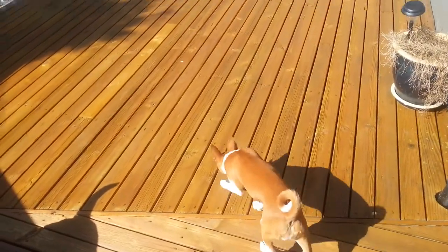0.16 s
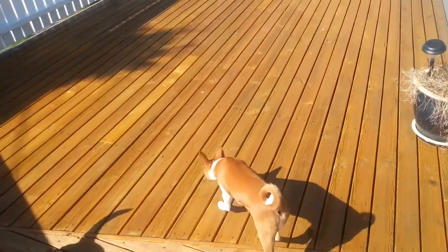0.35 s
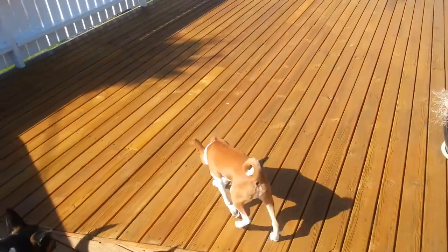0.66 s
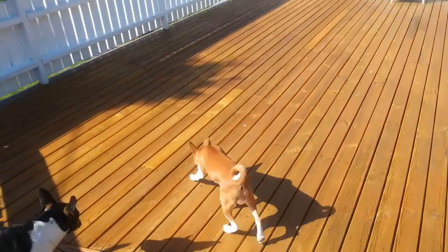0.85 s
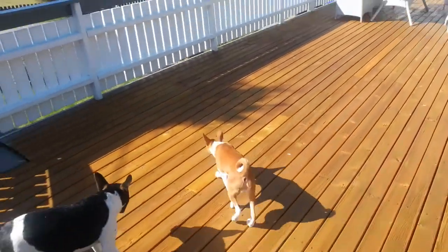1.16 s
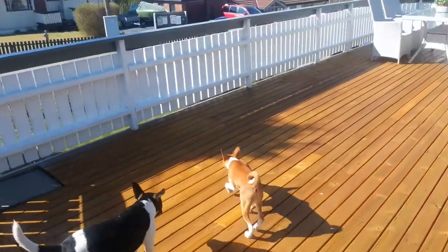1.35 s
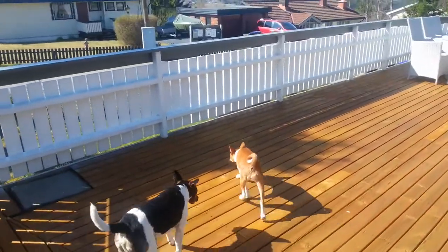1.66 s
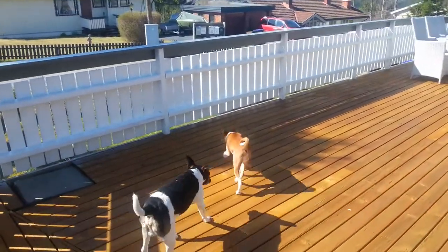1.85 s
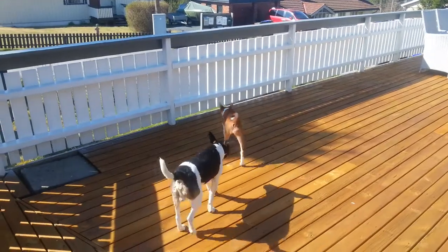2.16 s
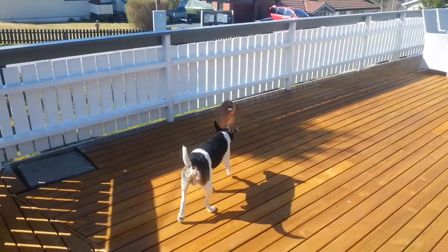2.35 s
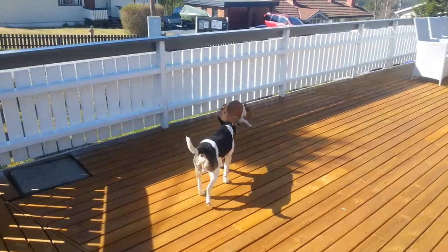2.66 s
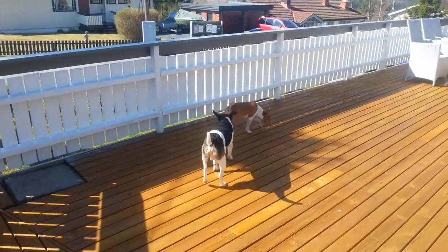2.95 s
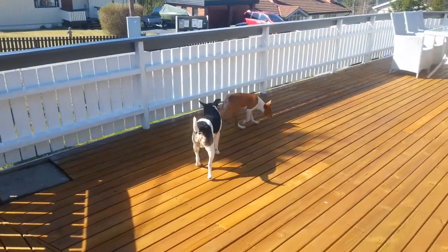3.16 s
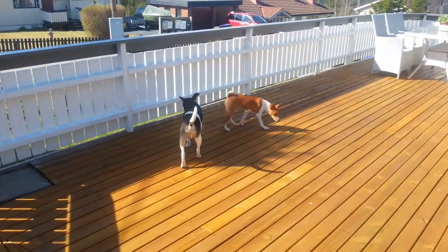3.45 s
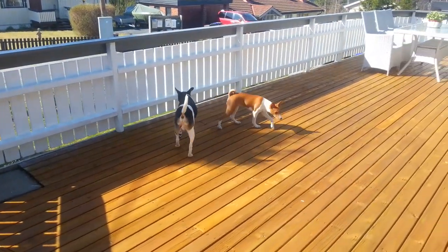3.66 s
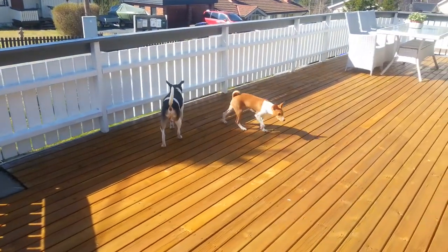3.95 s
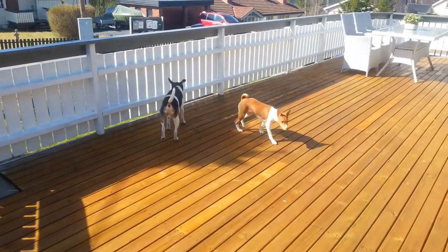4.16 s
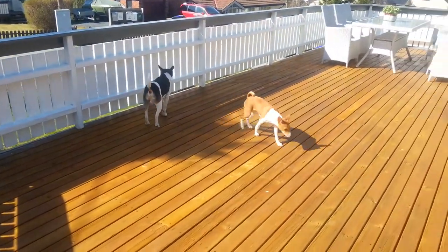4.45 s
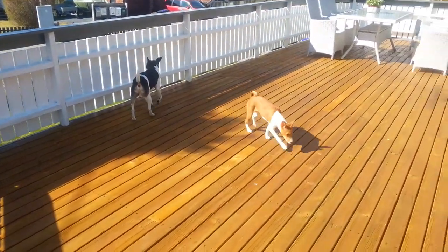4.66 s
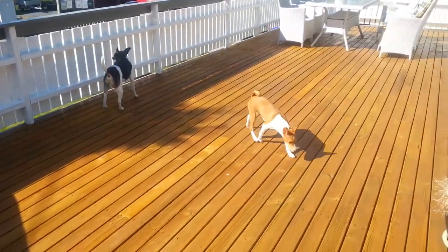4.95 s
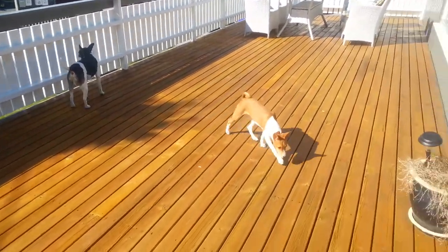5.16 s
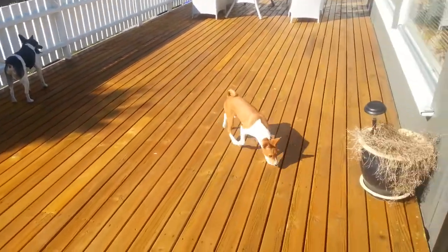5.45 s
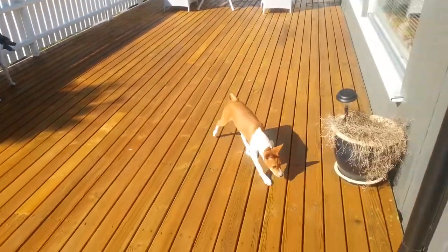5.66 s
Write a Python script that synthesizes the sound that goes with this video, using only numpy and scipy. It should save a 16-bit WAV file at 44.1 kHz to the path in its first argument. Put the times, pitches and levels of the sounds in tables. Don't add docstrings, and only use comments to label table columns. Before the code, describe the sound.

Dog claws click sharply and irregularly over a hollow wooden deck, then sparse steps, a faint songbird, and wind buffeting the microphone at the end.

```python
import sys
import numpy as np
from scipy import signal
from scipy.fft import rfft, irfft, next_fast_len
from scipy.io import wavfile
from scipy.ndimage import uniform_filter1d

SR = 44100
rng = np.random.default_rng(int(sys.argv[2]) if len(sys.argv) > 2 else 0)


def ratio_of_db(decibels):
    return 10 ** (np.asarray(decibels, float) / 20)


def pcm_store(signal):
    levels = np.round(np.clip(np.atleast_2d(signal), -1, 1) * 32767)
    wavfile.write(sys.argv[1], SR, levels.astype(np.int16).T)


N = 255339
SIDES = np.array([[.5], [-.5]])


def unit(x):
    return x / np.sqrt(np.mean(x ** 2, axis=-1, keepdims=True))


def tilt(x, points, share=1):
    size = next_fast_len(x.shape[-1], True)
    hz = np.fft.rfftfreq(size, 1 / SR) + 1
    p = np.array(points, float)
    gain_db = np.interp(np.log(hz), np.log(p[:, 0]), p[:, 1])
    return irfft(rfft(x, size) * ratio_of_db(gain_db * share), size)[..., :x.shape[-1]]


def coloured(x, points, lo_hz=1, hi_hz=SR / 2.1):
    band = signal.butter(3, [lo_hz, hi_hz], "band", fs=SR, output="sos")
    return unit(signal.sosfilt(band, tilt(x, points)))


def walk(rate, channels=2):
    k = int(SR / rate)
    held = np.repeat(rng.standard_normal((channels, N // k + 1)), k, axis=1)
    return unit(uniform_filter1d(uniform_filter1d(held, k), k)[:, :N])


def columns(table):
    s, *rest = np.transpose(table)
    return [np.interp(np.arange(N) / SR, s, c) for c in rest]


def add(out, s, sound):
    i = int(s * SR)
    out[..., i:i + sound.shape[-1]] += sound[..., :N - i]


def suppressor(near, over_db, depth_db):
    frame = np.hanning(int(0.036 * SR))
    power = signal.fftconvolve(np.mean(near ** 2, axis=0), frame / frame.sum(), "same")
    power = np.maximum(power, 0)
    return ratio_of_db(depth_db * power / (power + ratio_of_db(over_db) ** 2))


# [f/Hz, level/dB per Hz]
SUBURB_COLOUR = [(18, -36), (30, 2), (176, -9), (437, -8.5), (662, -17), (905, -11), (1970, -23.5),
                 (2490, -17.5), (2990, -19), (6880, -18.5), (13500, -21.5), (15000, -30.5)]
# [f/Hz, likeness 0-1]
LIKENESS = [(60, 0), (130, 1), (290, 0.95), (640, 0.73), (1410, 0.3), (3100, 0.2), (6820, 0.2),
            (15000, 0.19)]
# [t/s, level/dB]
BACKGROUND_SWELL = [
    (0, 1),
    (.8, 0),
    (1.5, 1),
    (2.4, -0.5),
    (3.7, 3.5),
    (4.3, 3.5),
    (5.1, 0),
    (5.5, 0),
    (5.79, 7),
]
# [f/Hz, level/dB rms, drift/dB per s]
HUM = [
    (135, -87, -0.5),
    (264, -81.5, -.5),
    (442, -79.5, -2.5),
]


def suburb(steps, gusts):
    swell_db, = columns(BACKGROUND_SWELL)
    middle_db, treble_db = -73 + swell_db, -83.5 + 0.47 * swell_db
    mid, side = rng.standard_normal((2, N))
    likeness = np.clip(LIKENESS, [1, 0], [SR, .9])
    side = coloured(side, [(hz, 10 * np.log10((1 - c) / (1 + c))) for hz, c in likeness])
    pair = mid + 0.97 * side * np.sign(SIDES)
    bass = coloured(pair, SUBURB_COLOUR, lo_hz=105, hi_hz=529) * ratio_of_db(-71.5 + 0.5 * walk(2.3))
    middle = coloured(pair, SUBURB_COLOUR, lo_hz=532, hi_hz=2190) * ratio_of_db(middle_db + 0.19 * walk(4.2))
    hiss_db, flicker_db = 8.5, 1.2
    treble = coloured(pair, SUBURB_COLOUR, lo_hz=2000) * ratio_of_db(treble_db + hiss_db + flicker_db * walk(7.9))
    t, hum, wander_db = np.arange(N) / SR, 0, 3
    for hz, db, drift_db in HUM:
        level = ratio_of_db(db + drift_db * t + wander_db * walk(8, channels=1))
        hum = hum + level * np.sin(2 * np.pi * hz * t + walk(6.4, channels=1))
    by_steps = suppressor(steps, over_db=-67.5, depth_db=4.5)
    by_wind = suppressor(gusts, over_db=-58.5, depth_db=8)
    low = (bass + hum) * by_steps ** 0.74
    return low + middle * by_steps ** 0.96 * by_wind + treble * by_steps * by_wind ** 0.52


# [f/Hz, level/dB per Hz]
WIND_COLOUR = [(25, -8), (60, 4), (128, -1), (392, -20), (650, -34), (1000, -58), (2000, -85)]
# [t/s, level/dB]
BREEZE = [(0, -69), (.25, -79), (.4, -63), (.55, -61), (.75, -71), (.85, -82), (.93, -66), (1.1, -86),
          (1.7, -85), (2, -72.5), (2.35, -72), (2.6, -76), (3.2, -72), (3.5, -84), (3.7, -75.5), (4.4, -83),
          (5.1, -85), (5.79, -80)]


def breeze():
    db, = columns(BREEZE)
    rumble = coloured(rng.standard_normal((2, N)), WIND_COLOUR, hi_hz=100)
    return rumble * ratio_of_db(db + 2.5 + 2.5 * walk(25))


# [t/s, level/dB, half length/ms]
LEFT_EDDIES = [(.629, -45, 14), (.67, -48.5, 16), (.919, -41, 4.4), (2.648, -48, 14), (2.855, -49.5, 12),
               (2.927, -32, 11), (2.986, -31, 10), (3.011, -47, 13), (3.072, -35, 12), (3.17, -54, 55),
               (3.333, -46.5, 5.6), (3.679, -55.5, 26), (4.53, -49.5, 32), (4.591, -59, 18),
               (4.623, -36, 8), (4.665, -46, 19), (4.728, -39.5, 41), (4.772, -48.5, 11), (4.845, -41, 7.4),
               (4.9, -45.5, 27), (4.977, -54, 13), (5.291, -44.5, 3.9), (5.333, -39.5, 8.5),
               (5.424, -30, 21), (5.561, -37, 37), (5.615, -39, 22), (5.71, -49, 33), (5.78, -38.5, 27)]
# [t/s, level/dB, half length/ms, swing f/Hz]
RIGHT_EDDIES = [(0.049, -56.5, 134, 104), (.39, -42, 33, 105), (.533, -43, 28, 100),
                (0.625, -38.5, 8.6, 136), (.709, -58.5, 24, 141.4), (.924, -54.5, 18, 199.6),
                (2.005, -55, 40, 105), (2.324, -53, 22, 101), (2.797, -28.5, 7.6, 91),
                (2.856, -35.5, 24, 107), (2.881, -52, 12, 91.5), (2.961, -19, 9.8, 186),
                (3.003, -23, 12.4, 150), (3.039, -25.5, 10, 150.4), (3.079, -39, 19, 100),
                (3.154, -40, 19.6, 78), (4.547, -35, 14, 81.5), (4.607, -22, 9.7, 74.3),
                (4.575, -41, 7.2, 140), (4.701, -28, 8.2, 142), (4.722, -28.5, 9, 109),
                (4.745, -30, 8, 119), (4.786, -36, 16, 107.2), (4.84, -24, 5.7, 89),
                (4.841, -31.5, 6.8, 257), (4.866, -29.5, 10, 110), (4.881, -22, 7.6, 173),
                (4.908, -30, 14, 115), (4.97, -46.5, 12, 85), (5.319, -38.5, 12, 90), (5.42, -35, 21, 99),
                (5.478, -32, 6.8, 130), (5.502, -25, 8, 138), (5.534, -30, 6.2, 142),
                (5.551, -30.5, 5.2, 130), (5.573, -26, 11, 172), (5.602, -25, 4.9, 121),
                (5.617, -30, 5.6, 130), (5.635, -16, 5.2, 127), (5.657, -23, 7, 192),
                (5.666, -28, 6.9, 100), (5.703, -11.5, 9, 172), (5.716, -21, 9.1, 340),
                (5.721, -19.5, 8, 118), (5.739, -13, 11.7, 151), (5.739, -17.5, 9.3, 372.6),
                (5.765, -19.5, 12, 233), (5.784, -13.5, 7.1, 139)]


def wind():
    swings, power, t = np.zeros((2, N)), np.zeros((2, N)), np.arange(N) / SR
    waver = np.cumsum(1 + 0.2 * walk(110), axis=1) / SR
    for port, eddies in enumerate((LEFT_EDDIES, RIGHT_EDDIES)):
        for s, db, half_ms, *swing in eddies:
            hz = swing[0] if swing else 130
            near = slice(max(int((s - .2) * SR), 0), int((s + .2) * SR))
            age = (t[near] - s) / max(half_ms / 1000, .004)
            turns = hz * (waver[port, near] - waver[port, int(s * SR)])
            swings[port, near] += ratio_of_db(db - 3.0 - 6.5 * age ** 2) * np.cos(2 * np.pi * turns)
            power[port, near] += ratio_of_db(db - 6.84 * np.abs(age)) ** 2
    body = coloured(rng.standard_normal((2, N)), WIND_COLOUR, hi_hz=241)
    edge = coloured(ratio_of_db(2.6 * walk(90)) * rng.standard_normal((2, N)), WIND_COLOUR, lo_hz=230)
    return swings + ratio_of_db(-8.0) * np.sqrt(power) * body + ratio_of_db(-11.5) * power ** 0.56 * edge


# [t/s, level/dB, length/s, final f/Hz, slide/Hz]
HIGH_NOTES = [
    (3.17, -78, 0.11, 4870, 122),
    (3.77, -63.5, 0.18, 4800, 373),
    (4.455, -62, 0.2, 4813, 416),
    (5.16, -71, 0.2, 4830, 425),
]
# [t/s, level/dB, length/s, final f/Hz, slide/Hz]
LOW_NOTES = [
    (3.435, -77, 0.22, 3370, 150),
    (4.17, -66.5, .17, 3405, 70),
    (4.31, -84, 0.25, 2750, 40),
    (4.85, -63.5, 0.17, 3445, 60),
]


def bird():
    song, (waver, flutter) = np.zeros(N), walk(70)
    husk = walk(220, channels=1)[0]
    for notes, upper_db, swell, soft in ((HIGH_NOTES, -9, 1.1, .6), (LOW_NOTES, -40, .55, 1.1)):
        for s, db, length, last_hz, drop_hz in notes:
            t = np.arange(0, length, 1 / SR)
            i = slice(int(s * SR), int(s * SR) + len(t))
            shape = np.sin(np.pi * (t / length) ** swell) ** soft * ratio_of_db(flutter[i])
            hz = last_hz + drop_hz * np.exp(-t / .05) + 21.8 * waver[i]
            whistle = shape * (1 + ratio_of_db(-7) * husk[i]) * np.sin(2 * np.pi * np.cumsum(hz) / SR)
            upper = ratio_of_db(upper_db) * (drop_hz / 400) ** 2 * np.exp(-t / 0.13) * np.minimum(t / 0.005, 1)
            upper = upper * husk[i] * np.sin(2 * np.pi * 5400 * t)
            song[i] += ratio_of_db(db) * (whistle + upper)
    t = np.arange(SR // 2) / SR
    echoes = rng.standard_normal((2, len(t))) * (np.exp(-t / 0.049) + ratio_of_db(-20.5) * np.exp(-t / 0.22))
    echoes = echoes / np.sqrt(np.sum(echoes[0] ** 2))
    wet = signal.fftconvolve(song[None], echoes, axes=1)[:, :N]
    return (ratio_of_db(-7.5) * song + ratio_of_db(0.5) * wet) * ratio_of_db(7.1 * SIDES)


# [t/s, claw peak level/dB, pad level/dB, ring f/Hz, hollowness/dB]
WALK_OFF = [(0.102, -59, -63, 5860, -29), (0.3657, -52, -49.5, 3200, 0), (0.39, -23, -43, 4770, -8),
            (0.5352, -25, -38, 6600, 0.5), (0.6704, -58, -49.5, 6540, -5.5),
            (0.6968, -30.5, -45.5, 7000, 0), (0.9128, -33.5, -49, 3400, -0.5), (0.923, -39, -51, 3120, 9),
            (0.9345, -18.5, -37.5, 5860, -3.5), (1.166, -41.5, -53, 2290, -3.5),
            (1.2546, -50, -54.5, 7060, -18), (1.315, -28.5, -44.5, 5740, -1.5)]
# [t/s, claw peak level/dB, pad level/dB, ring f/Hz, hollowness/dB]
TROT = [(1.4514, -44, -52.5, 2400, -7.5), (1.567, -39.5, -52, 2560, 0.5), (1.6316, -54, -62, 5330, -1.5),
        (1.6791, -49, -47.5, 4860, -10), (1.716, -43, -49.5, 2330, -1.5), (1.8094, -42.5, -44, 2650, -5.5),
        (1.8942, -41, -47.5, 5140, -5), (2.0362, -60, -51, 5370, -3), (2.171, -40.5, -66, 4270, 7),
        (2.2528, -49, -58.5, 2000, 7.5), (2.4517, -51, -53, 2410, 11.5), (2.5326, -51, -58.5, 2110, 8.5),
        (2.566, -42, -49.5, 2750, 0), (2.6467, -28, -36, 1534, 4.5), (2.694, -47, -53, 1920, -2),
        (2.7245, -34, -47, 2290, 0.5), (2.8336, -33.5, -32.5, 2660, -6), (2.944, -56, -64.5, 1650, 14.5),
        (2.995, -38, -66, 1520, 18), (3.4119, -32.5, -53, 5200, 1.5), (3.596, -35.5, -41.5, 5570, 0),
        (3.716, -45.5, -45, 6150, -11.5), (3.8938, -39, -53.5, 5000, 10), (4.164, -50.5, -61.5, 2560, 1)]
# [t/s of the top, level/dB, 6 dB rise/ms, 6 dB fall/ms]
SCUFFS = [(.575, -53, 32, 10), (0.63, -67, 3, 30), (0.739, -63, -1, 10), (.828, -72, 2, 30),
          (1.059, -67.5, 22, 16), (1.493, -51, 5.5, 9), (1.537, -65, 6, 30), (1.793, -51, 11.5, 5.5),
          (1.938, -52, -1, 6), (2.19, -55.5, 18, 8.5), (2.301, -49, 18, 7), (2.409, -66.5, 14, 20),
          (2.6, -53, 12.5, 9.5), (2.787, -57.5, -1, 30), (3.288, -63.5, 20, -1), (3.349, -58, 9, -1),
          (3.527, -54, 5, 4), (3.817, -51.5, 2, 4.5), (4.032, -54.5, 1.5, 7), (4.259, -54, -1, 19),
          (4.6, -80.5, 30, 30), (4.684, -54, 1, 11.5), (4.94, -66.5, 6, 10.5), (5.306, -62, 10, 7),
          (5.548, -61.5, 30, 0.5), (5.756, -58.5, 35, 21)]


def slides():
    rows = []
    for s, _, db, _, hollow in WALK_OFF + TROT:
        rise_ms = 2 - 0.17 * (db + 39.0)
        fall_ms = 5.6 - 0.3 * (db + 37.0)
        rows.append((s + .0025, db, rise_ms, fall_ms, hollow))
    return rows + [(*row, -0.5) for row in SCUFFS]


# [f/Hz, level/dB per Hz]
SCUFF_COLOUR = [(300, -51), (800, -7.5), (1500, -2), (2500, -0.5), (4000, -4), (7000, -5.5), (9000, -12.5),
                (13500, -20), (15500, -48)]
# [f/Hz, width/Hz, level/dB]
PLANK = [
    (130, 13, 1.5),
    (284, 107, 3),
    (434, 19, -0.5),
]


def pads():
    out, push = np.zeros((2, N)), np.zeros(N)
    ms = 1000 * np.arange(8192) / SR - 45
    edges = np.clip(np.minimum(ms - ms[0], ms[-1] - ms) / 15, 0, 1)
    spots_hz = np.geomspace(600, 14000, 36)
    for s, db, rise, fall, dull_db in slides():
        noise, ripple = rng.standard_normal((3, len(ms))), rng.standard_normal(36)
        rise, fall = np.clip([rise, fall], .7, 30)
        slide = ratio_of_db(-6 * np.maximum(-ms / rise, ms / fall))
        echoes = ratio_of_db(-8.5 - np.maximum(0.41 * ms, -2.5 * ms))
        shape = edges * np.hypot(slide, echoes) * ratio_of_db(db - 1.5)
        spot_db = 3 * ripple + (dull_db + .5) / (1 + (spots_hz / 3200) ** 4)
        grit = unit(ratio_of_db(3.5 * unit(uniform_filter1d(noise[2], 50))))
        rub = unit(tilt(grit * noise[:2], SCUFF_COLOUR))
        sound = tilt(rub, np.transpose([spots_hz, spot_db]))
        add(out, s + ms[0] / 1000, shape * sound)
        add(push, s + ms[0] / 1000, shape * ratio_of_db(0.36 * dull_db) * noise[2])
    drum = sum(ratio_of_db(db) * signal.lfilter(*signal.iirpeak(hz, hz / width, SR), push) for hz, width, db in PLANK)
    return out + ratio_of_db(4.0) * drum


# [t/s, peak level/dB, ring f/Hz]
STRAY_CLAWS = [(0.367, -50, 2500), (0.382, -45, 3500), (.3966, -37, 5300), (.5328, -32.5, 4930),
               (.538, -26.5, 6300), (.6817, -45, 6500), (0.7015, -34.5, 2280), (.879, -57.5, 6740),
               (0.9277, -34.5, 5980), (1.046, -59.5, 2200), (1.3106, -46.5, 2400), (1.341, -48.5, 7000),
               (1.6746, -44, 5770), (1.7155, -39, 2400), (1.7859, -52.5, 4000), (1.8155, -47, 5370),
               (2.123, -55.5, 2450), (2.2831, -55, 4000), (2.2877, -41.5, 3200), (2.557, -52, 3000),
               (2.5718, -46, 3500), (2.6534, -40, 1470), (2.7173, -46, 3000), (2.7326, -42, 5540),
               (2.7842, -62, 2000), (2.8167, -47, 2500), (2.824, -30, 3870), (2.8282, -30, 5810),
               (2.8661, -46, 4000), (2.973, -50, 1480), (3.052, -59.5, 1380), (3.2, -53, 3200),
               (3.4075, -44, 5300), (3.5172, -57, 4200), (3.524, -49, 5300), (3.5932, -50, 5000),
               (3.5976, -36, 6500), (3.8979, -36.5, 5300), (3.9414, -52, 4000), (4.0338, -53, 5700),
               (4.128, -55, 5500), (4.6808, -40.5, 4800), (5.7555, -55, 2500)]
# [t/s, left minus right level/dB]
BEARING = [(.3, -2.5), (.6, -6.5), (.95, -9.5), (1.3, -2.5), (1.8, -8.5), (2.3, -2), (2.65, -5.5),
           (2.83, -3), (3.4, -2), (3.6, -2.5), (3.9, -1.5), (4.7, -1)]


def ticks():
    rows = [(s, db, hz, hollow) for s, db, _, hz, hollow in WALK_OFF + TROT]
    rows += [(s, db, hz, 3.5 * np.log2(hz / 3000)) for s, db, hz in STRAY_CLAWS]
    scatter_db = 8.5 * rng.uniform(-2.1, 1, len(rows))
    strikes = []
    for (s, db, hz, hollow), aside_db in zip(rows, scatter_db):
        pan_db = np.interp(s, *np.transpose(BEARING)) + aside_db
        strikes.append((s, db, pan_db, hz, -31.5 + 3.9 * hollow))
    return strikes


def claws():
    out, t = np.zeros((2, N)), np.arange(SR // 24) / SR
    crack_age = 1000 * t / 0.24
    strikes = ticks()
    chance = rng.random((len(strikes), 5, 40))
    for (s, db, pan_db, ring_hz, wood_db), (place, life, late, *mix) in zip(strikes, chance):
        hz = 700 * 2 ** (4.3 * (np.arange(40) + place) / 40)
        mode_db = np.interp(np.log(hz), np.log([900, 1800, 2800, 6500, 8500, 14000]),
                            [wood_db - 15.5, wood_db + 10.5, 0, 1.5, -13, -32])
        mode_db = mode_db + 9 * np.exp(-np.log2(hz / ring_hz) ** 2 / .25)
        t60 = .0075 * (3000 / hz) ** .5 * (1 + life)
        age = np.maximum(t - 0.000389 * late[:, None] ** 2, 0)
        modes = np.sin(2 * np.pi * hz[:, None] * age) * np.exp(-np.log(1000) * age / t60[:, None])
        port_mix = 0.59 * mix[0] + 0.35 * np.array(mix) - .4
        body = (port_mix * ratio_of_db(mode_db) * np.sqrt(hz)) @ modes
        ring_t60 = 0.029 * (3000 / ring_hz) ** 1.5
        ring = np.sin(2 * np.pi * ring_hz * t) * np.exp(-np.log(1000) * t / ring_t60)
        crack = np.e * crack_age * np.exp(-crack_age) * np.sin(2 * np.pi * (4200 + 2500 * life[0]) * t)
        tick = body / np.abs(body).max(axis=1, keepdims=True)
        tick = tick + ratio_of_db(-5) * (2500 / ring_hz) ** 0.49 * ring + ratio_of_db(-3.5) * crack
        add(out, s, tick * ratio_of_db(db - 3.0 + pan_db * SIDES))
    return np.array([np.roll(out[0], 7), out[1]])


# [f/Hz, left minus right level/dB]
PORT_TILT = [(60, -34), (110, 2), (200, 0.5), (380, 2), (700, 2), (1290, 2.5), (2380, 0.5), (4400, 0.5),
             (8120, -3), (15000, -1)]


def ports(x):
    return tilt(x, PORT_TILT, SIDES)


def scene():
    steps, song, gusts = claws() + pads(), bird(), wind()
    settle = np.minimum(1, np.arange(N, 0, -1) / (.005 * SR))
    around = ports(steps + suburb(steps + song, gusts))
    far_song = song * suppressor(steps + gusts / 8, over_db=-63.0, depth_db=8.5)
    return settle * (around + far_song + gusts + breeze())


def denoise(x):
    hz, _, z = signal.stft(x, SR, nperseg=1024)
    power = np.abs(z) ** 2 + 1e-18
    steady = np.median(power, axis=-1, keepdims=True) * (hz / (hz + 900))[:, None]
    gain = np.sqrt(np.maximum(1 - 0.48 * steady / power, ratio_of_db(-7) ** 2))
    return signal.istft(z * gain, SR, nperseg=1024)[1][:, :N]


def band_limit(x):
    return signal.sosfilt(signal.butter(12, 15800, fs=SR, output="sos"), x)


def record(dry):
    top = signal.ellip(6, .5, 30, 14800, fs=SR, output="sos")
    rumble = signal.butter(2, 55, "high", fs=SR, output="sos")
    mix = signal.sosfilt(np.vstack([top, rumble]), denoise(dry))
    return band_limit(mix)


dry = scene()
out = record(dry)
pcm_store(out)
```